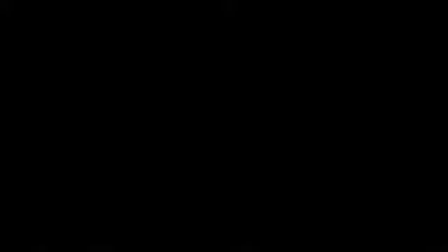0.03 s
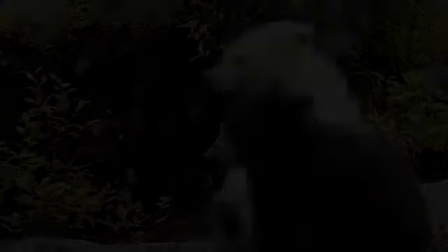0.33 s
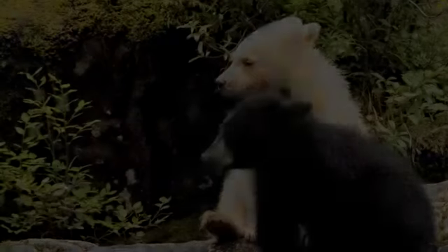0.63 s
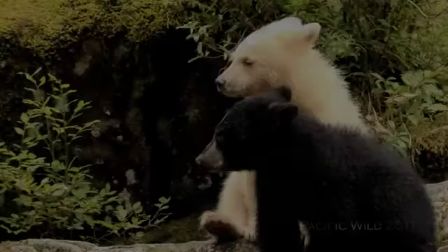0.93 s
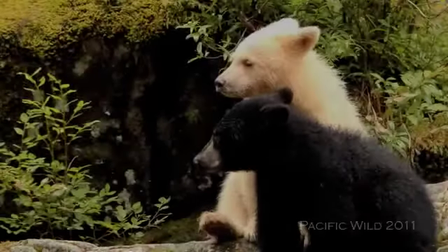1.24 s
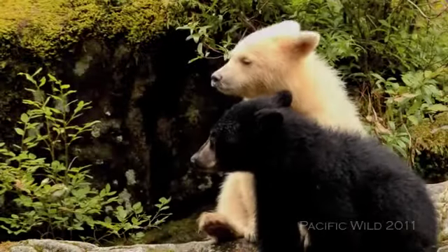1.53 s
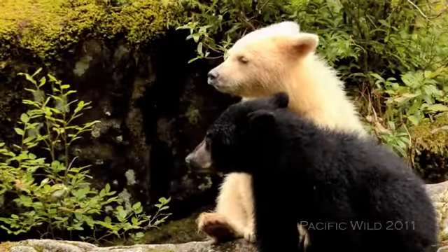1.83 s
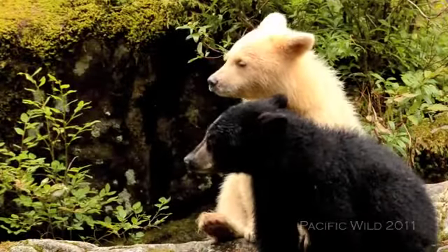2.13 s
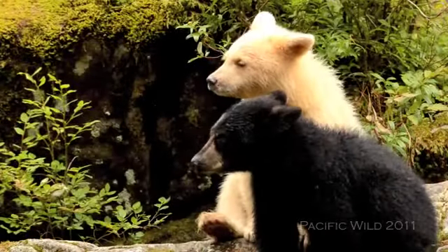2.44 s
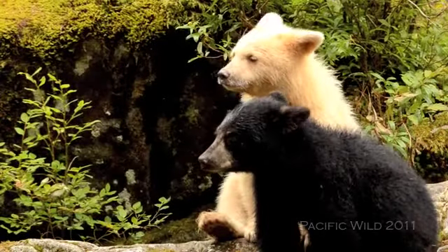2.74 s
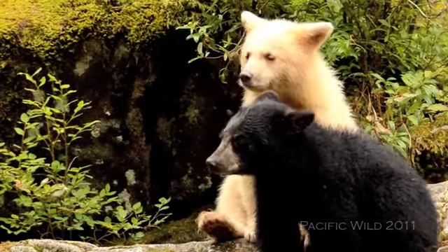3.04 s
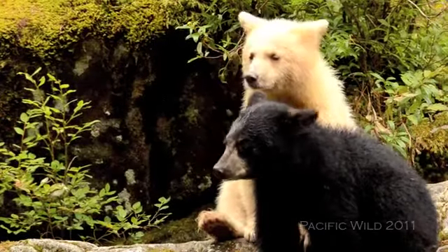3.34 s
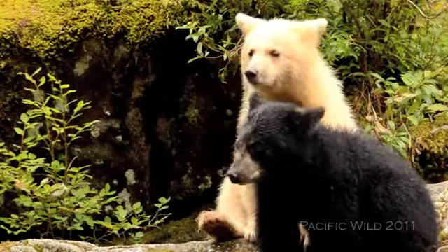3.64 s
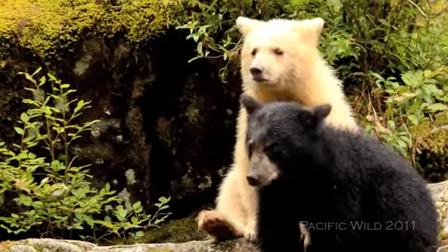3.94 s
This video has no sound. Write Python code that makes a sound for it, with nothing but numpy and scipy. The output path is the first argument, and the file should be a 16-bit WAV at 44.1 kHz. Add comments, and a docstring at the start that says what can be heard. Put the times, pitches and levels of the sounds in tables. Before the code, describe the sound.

A forest stream rushes steadily over rocks, fading in from silence.

```python
"""A forest stream, rushing steadily over rocks, fades in from silence over two seconds.
Churning white water lays down the bed: a broad, gently surging wash of noise.
Countless small bubbles ring inside it as short rising pings, and spray lands in tiny puffs of hiss.
The sound is mono, with two narrow notches in the treble."""
import sys
import numpy as np
from scipy import signal
from scipy.fft import rfft, irfft
from scipy.io import wavfile

SR = 44100
rng = np.random.default_rng(int(sys.argv[2]) if len(sys.argv) > 2 else 0)


def store_wav(level_fs):
    """Save 16-bit WAV to argv[1]."""
    pcm = np.round(np.clip(np.atleast_2d(level_fs), -1, 1) * 32767)
    wavfile.write(sys.argv[1], SR, pcm.T.astype(np.int16))


N = 176400

# tone of the white water: f/Hz, relative level/dB
WASH_EQ = [(20, -26), (52, -19.5), (76, -6.5), (95, -10.5), (126, -0.2), (162, -6.5), (196, -1),
           (320, -2.5), (420, -1.5), (505, 1.5), (700, -1.5), (1120, -1), (1280, -4), (1700, -3.5),
           (2100, -5), (3700, -7), (4500, -11.5), (6300, -13), (7000, -14), (7800, -14.5), (9000, -21),
           (10300, -29)]
# tone of the bubbles and splashes: f/Hz, relative level/dB
SPLASH_EQ = [(250, -14.5), (500, -0.5), (1100, 3), (2000, 1), (3600, -3), (5000, -7), (7700, -11.5),
             (10300, -20)]
# narrow cuts in the treble: f/Hz, width/Hz, level/dB
TREBLE_NOTCHES = [(5714, 274, -13), (6905, 110, -11)]
# stronger swells and lulls of the flow: t/s, half length/s, level/dB
FLOW_SWELLS = [(1.59, 0.074, -1.1), (2.13, 0.036, 0.8), (3.714, 0.055, 1.2)]

WASH_DB, BUBBLES_DB, SPLASHES_DB = -21, -30, -38.5  # rms of each layer going into the mix
GUSH_DB, GUSH_S, GUSH_WIDTH_HZ = 0.82, 0.059, 440
BUBBLES_PER_S, BUBBLE_LOW_HZ, BUBBLE_HIGH_HZ = 2400, 420, 9020
BUBBLE_CYCLES, BUBBLE_RISE = 9.4, 0.026  # cycles and relative pitch rise per decay time
DRIFT_DB, DRIFT_SLOW_HZ, DRIFT_FAST_HZ = 0.14, 2.5, 18
FADE_START_S, FADE_LENGTH_S, HIGH_CUT_HZ = 0.12, 1.92, 10370


def amp(db):
    """Decibels to gain."""
    return 10 ** (np.asarray(db) / 20)


def unit(x):
    """Scales to an rms of one."""
    return x / np.sqrt(np.mean(x ** 2) + 1e-20)


def equalise(x, curve):
    """Shapes the tone with an EQ curve drawn on a log-frequency axis."""
    hz, db = np.transpose(curve)
    bins = np.fft.rfftfreq(N, 1 / SR)
    curve_db = np.interp(np.log(bins + 1), np.log(hz), db)
    return irfft(rfft(x) * amp(curve_db), N)


def triggers(per_s, spread_db=3):
    """Random clicks, many small and a few large."""
    size = np.minimum(rng.exponential(1, N), 5)
    polarity = rng.choice([-1, 1], N)
    hits = rng.random(N) < per_s / SR
    return amp(spread_db * size) * polarity * hits


def white_water(frame=512):
    """Churning water makes a dense wash; short gushes lift and dip patches of its spectrum."""
    hz, t, spectrum = signal.stft(rng.standard_normal(N), SR, nperseg=frame)
    across_hz = np.fft.fftfreq(len(hz), hz[1])[:, None]
    along_time = np.fft.fftfreq(len(t), t[1])
    # blur random specks into gush-sized patches
    blur = np.exp(-2 * ((across_hz * GUSH_WIDTH_HZ) ** 2 + (along_time * GUSH_S) ** 2))
    specks = rng.standard_normal(spectrum.shape)
    gushes = unit(np.fft.ifft2(np.fft.fft2(specks) * blur).real)
    churn = signal.istft(spectrum * amp(GUSH_DB * gushes), SR, nperseg=frame)[1][:N]
    return amp(WASH_DB) * unit(equalise(churn, WASH_EQ))


def bubbles(sizes=36, ring_samples=3000):
    """Bubbles of many sizes ping briefly, bending up in pitch as they surface."""
    t = np.arange(ring_samples) / SR
    pitches = np.geomspace(BUBBLE_LOW_HZ, BUBBLE_HIGH_HZ, sizes) * rng.uniform(0.96, 1.03, sizes)
    shares = np.sqrt(pitches) / np.sqrt(pitches).sum()  # high pings come more often
    babble = np.zeros(N)
    for hz, share in zip(pitches, shares):
        age = hz * t / BUBBLE_CYCLES  # in decay times
        ping = np.exp(-age) * np.sin(2 * np.pi * hz * t * (1 + BUBBLE_RISE * age / 2))
        pings = signal.oaconvolve(triggers(BUBBLES_PER_S * share), ping)[:N]
        babble += np.sqrt(hz) * unit(pings)
    return amp(BUBBLES_DB) * unit(equalise(babble, SPLASH_EQ))


def splashes(per_s=400, puff_samples=130):
    """Spray lands on rock in tiny puffs of noise, each with a hard attack and a quick decay."""
    decay = np.linspace(1, 0, puff_samples)
    power = signal.oaconvolve(triggers(per_s) ** 2, decay ** 2)[:N]
    spray = np.sqrt(abs(power)) * rng.standard_normal(N)
    return amp(SPLASHES_DB) * unit(equalise(spray, SPLASH_EQ))


def surge(count=30):
    """The flow rides the overall gain: a few brief swells and lulls over a faint random drift."""
    t = np.arange(N) / SR
    rates = np.geomspace(DRIFT_SLOW_HZ, DRIFT_FAST_HZ, count)
    drift = unit(sum(np.sin(2 * np.pi * (hz * t + rng.random())) for hz in rates))
    swells_db = sum(db * np.exp(-((t - at) / half) ** 2) for at, half, db in FLOW_SWELLS)
    return amp(DRIFT_DB * drift + swells_db)


def scene():
    """The three water layers surge together, panned dead centre."""
    stream = (white_water() + bubbles() + splashes()) * surge()
    return np.array([stream, stream])


def record(dry):
    """Master chain: two treble notches, a linear fade-in and a steep high cut."""
    bins = np.fft.rfftfreq(N, 1 / SR)
    notches_db = sum(db / (1 + (2 * (bins - hz) / width) ** 2) for hz, width, db in TREBLE_NOTCHES)
    notched = irfft(rfft(dry) * amp(notches_db), N)
    fade = np.clip((np.arange(N) / SR - FADE_START_S) / FADE_LENGTH_S, 0, 1)
    high_cut = signal.firwin(1501, HIGH_CUT_HZ, window=("kaiser", 9), fs=SR)
    return signal.oaconvolve(notched * fade, high_cut[None], "same")


dry = scene()
out = record(dry)
store_wav(out)
```